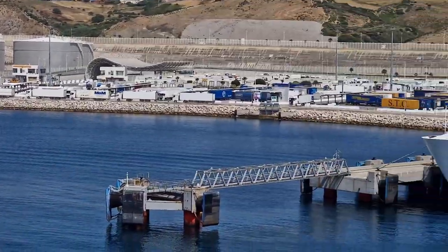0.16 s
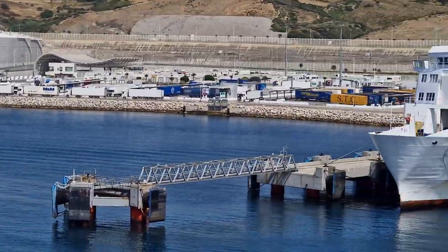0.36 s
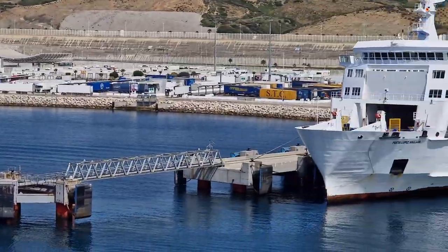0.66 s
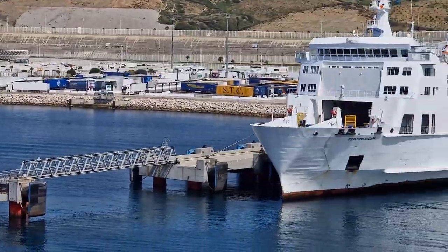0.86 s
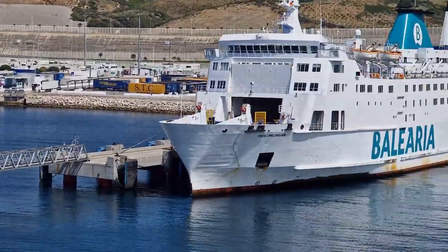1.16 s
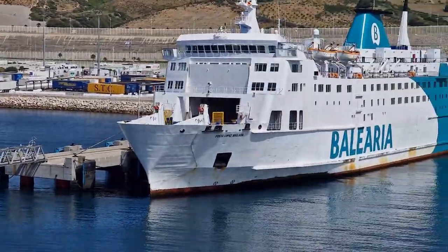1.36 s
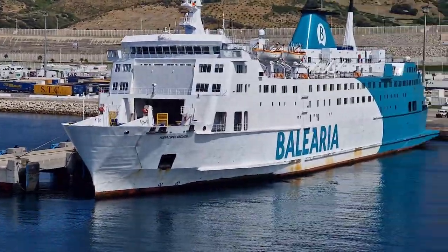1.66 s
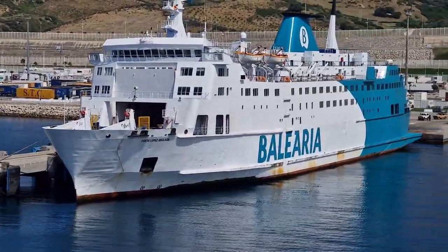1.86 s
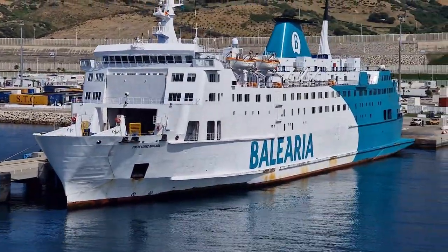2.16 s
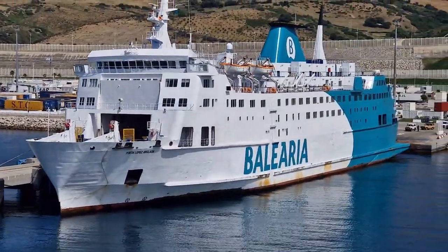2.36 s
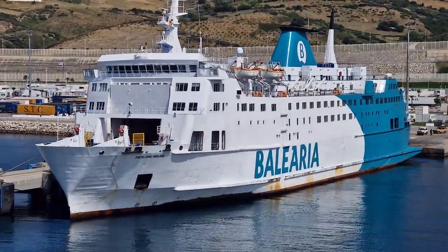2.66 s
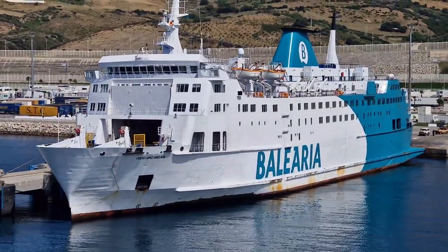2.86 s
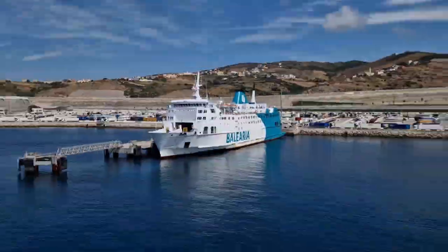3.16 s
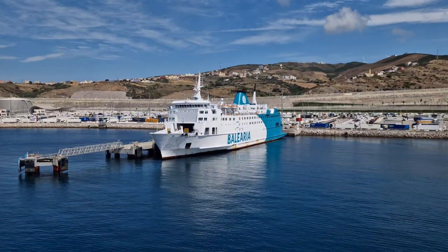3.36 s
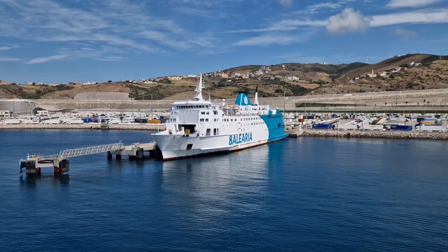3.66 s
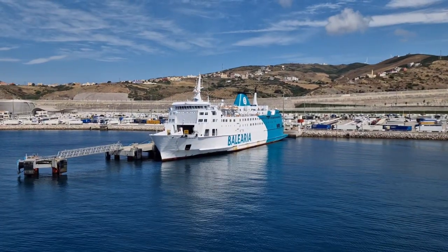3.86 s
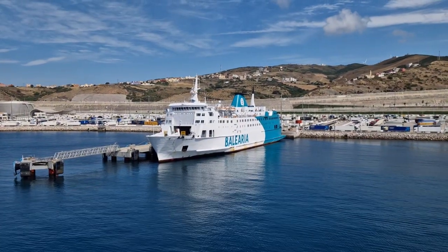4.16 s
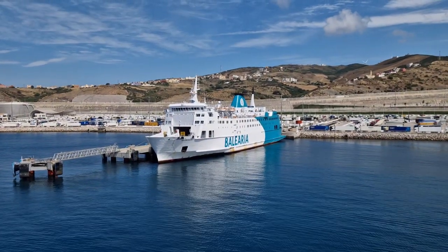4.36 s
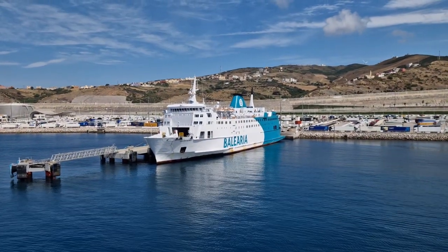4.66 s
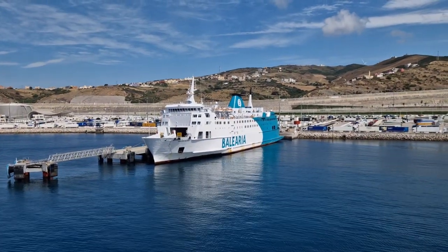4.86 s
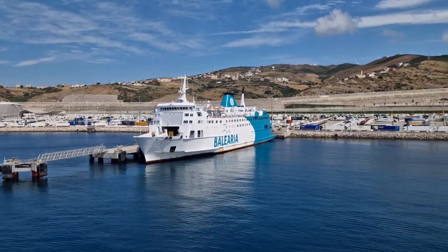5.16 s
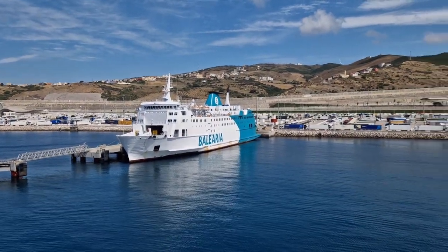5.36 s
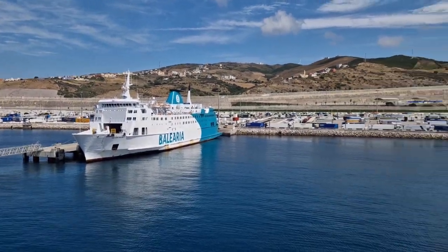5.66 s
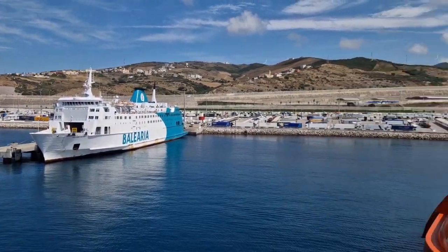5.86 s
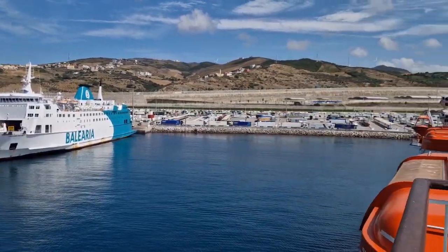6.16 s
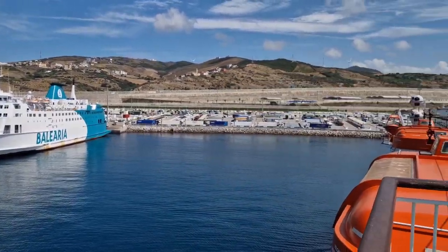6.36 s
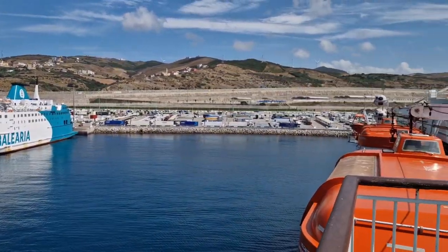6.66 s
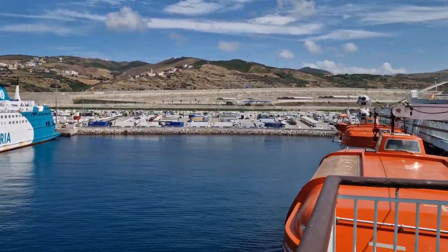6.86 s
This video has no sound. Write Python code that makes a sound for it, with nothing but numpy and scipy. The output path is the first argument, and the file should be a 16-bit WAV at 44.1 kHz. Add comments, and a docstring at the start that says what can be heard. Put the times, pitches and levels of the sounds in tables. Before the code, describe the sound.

On the open deck of a ferry in a harbour, wind buffets the microphone with a fluttering low rumble that mixes with the throb of two slow diesel engines. Behind them, deck ventilators roar and hiss with a faint, wavering whine. The rumble is strongest for the first three seconds, then eases a little, and the ventilator noise drifts toward the right as the microphone turns.

```python
"""The open deck of a ferry under way in a harbour. Two slow diesel engines run at nearly the same speed,
so their exhaust tones drift in and out of step and throb. Wind buffets the microphone with a fluttering
rumble. Behind them the deck ventilators roar, hiss and whine faintly as fans push air through ducts and
grilles; the roar and hiss slide between left and right as the microphone turns."""
import sys
import numpy as np
from scipy import signal
from scipy.fft import rfft, irfft
from scipy.io import wavfile
from scipy.ndimage import uniform_filter1d, minimum_filter1d

SR = 44100
rng = np.random.default_rng(int(sys.argv[2]) if len(sys.argv) > 2 else 0)


def log_audio(samples):
    """Write samples as a 16-bit WAV file to the path given in sys.argv[1]."""
    # one column per channel
    frames = np.atleast_2d(samples).T
    # limit to full scale, then quantise
    limited = np.clip(frames, -1, 1)
    pcm = np.round(limited * 32767).astype(np.int16)
    wavfile.write(sys.argv[1], SR, pcm)


N = 309305
TIME, SPECTRUM_HZ = np.arange(N) / SR, np.fft.rfftfreq(N, 1 / SR)
FRAME, HOP = 1024, 256  # air noise is built in short overlapping slices: length and step in samples
FRAME_S = (np.arange(N // HOP + 5) * HOP / SR)[:, None]
BIN_HZ = np.fft.rfftfreq(FRAME, 1 / SR)
MAIN_HZ, SECOND_HZ = 4.188, 4.24  # working cycles per second of each diesel

# Where the ventilators are as the microphone turns.
# Each row: time in seconds, lag in milliseconds (how much later the left side hears them).
LEFT_LAG = [(0, -0.14), (.9, -0.13), (1.3, -0.12), (1.6, 0.032), (3, -0.032), (4.75, 0.06), (5.25, 0.13),
            (5.75, .18), (6.25, 0.28), (7, 0.28)]
# The bass drops as the microphone leaves the strongest wind.
# Each row: time in seconds, bass level in dB, lift of the wind against the engines in dB.
BASS_LEVELS = [(0, -11, .5), (1.3, -9.5, -.5), (2, -10.5, 3.5), (2.5, -8.5, 1.5), (3.1, -11, -1),
               (3.25, -15, 2), (4.3, -14.5, 0.5), (5.75, -16.5, 0.8), (6.45, -15.5, 0.5), (7, -17.5, -1)]


def gain_of(db):
    """Turn decibels into a number to multiply by."""
    return 10 ** (np.asarray(db) / 20)


def normalised(x):
    """Scale a signal so that its average power is 1."""
    return x / np.sqrt(np.mean(x ** 2) + 1e-20)


def at_pitch(rows, hz):
    """Look up a table by frequency, sliding evenly in pitch from row to row."""
    row_hz, values = np.transpose(rows)
    return np.interp(np.log(hz + 1), np.log(row_hz + 1), values)


def at_time(rows, t):
    """Look up each column of a table at the times t, sliding from row to row."""
    seconds, *columns = np.transpose(rows)
    return [np.interp(t, seconds, column) for column in columns]


def coloured(x, rows):
    """Turn frequencies up or down. Each row: frequency in Hz, gain in dB."""
    return irfft(rfft(x) * gain_of(at_pitch(rows, SPECTRUM_HZ)), N)


def bump(centre, width, x):
    """A smooth rise to 1 at the centre and a fall after it."""
    return np.exp(-(2 * (x - centre) / width) ** 2)


def drift(rate_hz):
    """A random wobble, mostly slower than rate_hz."""
    return normalised(irfft(rfft(rng.standard_normal(N)) * np.exp(-(SPECTRUM_HZ / rate_hz) ** 2), N))


def tone(hz, db, waver_db, wander_radians, rate_hz):
    """One tone whose loudness and pitch waver in the moving air."""
    phase = 2 * np.pi * (hz * TIME + rng.random()) + wander_radians * drift(rate_hz)
    return gain_of(db) * normalised(gain_of(waver_db * drift(rate_hz)) * np.sin(phase))


def fan_whine():
    """Spinning fan blades make thin, wavering tones."""
    # Each row: frequency in Hz, level in dB.
    blade_tones = [(320, -40), (485, -47), (3272, -62.5), (3375, -66), (3682, -63.5), (3885, -67),
                   (4365, -66.5)]
    return sum(tone(hz, db, waver_db=3, wander_radians=1.15, rate_hz=5.8) for hz, db in blade_tones)


def air_noise(colour_db, patchy_db, flicker_db):
    """Ventilator noise, left and right: some arrives straight, the rest bounces off the ship."""
    # Each row: time in seconds, share that arrives straight (0 to 1) before scaling by pitch.
    direct_share = [(0, 0.57), (1, 0.61), (1.45, 0.05), (3, 0.19), (4.6, 0.03), (5.3, 0.47), (6, 0.61),
                    (7, 0.73)]
    # Each row: frequency in Hz, how alike the bounced sound is on both sides (-1 to 1).
    bounced_likeness = [(250, 0.98), (600, 0.68), (1000, 0.51), (1800, .52), (2400, -0.074),
                        (3100, -0.0023), (3900, -0.49), (4800, 0.37), (7500, 0.13), (11000, 0.025)]
    # The microphone's housing shades one side.
    # Each row: frequency in Hz, left minus right in dB per millisecond of lag.
    housing_shadow = [(300, 9.5), (900, 3), (1550, 21.5), (2200, 14.5), (3000, -1.5), (4800, -17.5),
                      (7500, -8), (12000, -4.5)]
    shape = (len(FRAME_S), len(BIN_HZ))
    straight, bounced, separate = rng.standard_normal((3, *shape)) + 1j * rng.standard_normal((3, *shape))
    patches = uniform_filter1d(rng.standard_normal(shape), size=24, axis=0)  # smooth over time
    patches = normalised(uniform_filter1d(patches, size=4, axis=1))  # and over frequency
    flicker = normalised(uniform_filter1d(rng.standard_normal(FRAME_S.shape), size=5, axis=0))
    # The highest pitches are scattered most.
    pitch_factor = at_pitch([(500, 0.89), (1600, 1.16), (4000, 0.87), (10000, .3)], BIN_HZ)
    share = np.clip(at_time(direct_share, FRAME_S)[0] * pitch_factor, 0, 1)
    lag_ms, = at_time(LEFT_LAG, FRAME_S)
    delay = np.exp(-2j * np.pi * BIN_HZ * lag_ms / 1000)
    alike = np.clip(at_pitch(bounced_likeness, BIN_HZ), -1, 1)
    bounced_right = alike * bounced + np.sqrt(1 - alike ** 2) * separate
    left = np.sqrt(share) * straight * delay + np.sqrt(1 - share) * bounced
    right = np.sqrt(share) * straight + np.sqrt(1 - share) * bounced_right
    shadow = gain_of(lag_ms * at_pitch(housing_shadow, BIN_HZ) / 2)
    slices = np.array([left * shadow, right / shadow])
    slices *= gain_of(colour_db + patchy_db * patches + flicker_db * flicker)
    return signal.istft(slices.transpose(0, 2, 1), nperseg=FRAME, noverlap=FRAME - HOP)[1][:, :N]


def level_swells(t):
    """The roar and hiss briefly grow louder or brighter: the changes in dB at the times t."""
    # Each row: middle and length in seconds, then roar, brightness, hiss and fizz changes in dB.
    swells = [(1.0, .27, -1, 3, 0, -1), (2.994, .34, 4, 1.5, 2.5, 2.8)]
    return sum(np.multiply.outer(lifts_db, bump(s, length, t)) for s, length, *lifts_db in swells)


def grille_hiss():
    """Air rushes through the grilles, with a high fizz that comes and goes."""
    # Each row: time in seconds, hiss level in dB, relative fizz in dB.
    levels = [(0, -39, -15.5), (0.75, -40, -19.5), (1.1, -38, -19.5), (1.6, -41, -18), (2.7, -41, -15.5),
              (3.2, -43, -10), (3.87, -42, -9.5), (4.07, -42, -13.5), (5.4, -43, -15), (5.8, -38.5, -20),
              (7, -40, -18)]
    # Each row: frequency in Hz, relative strength in dB.
    spectrum = [(1500, -14), (2600, 0), (3200, 1), (3900, -2.5), (4700, -2), (5600, -4), (6800, -12.5),
                (7500, -6.5), (8300, -16.5), (9200, -18.5), (10500, -25.5), (15500, -22)]
    # The hiss heard from the side. Each row: frequency in Hz, change in dB per millisecond of lag.
    side_colour = [(2500, -11.5), (3700, 1), (5200, -10), (7400, -16.5), (9000, 11), (12000, 0.5)]
    level_db = at_time(levels, TIME)[0] + level_swells(TIME)[2]
    fizz_db = at_time(levels, FRAME_S)[1] + level_swells(FRAME_S)[3]
    lag_ms, = at_time(LEFT_LAG, FRAME_S)
    treble_db = at_pitch([(5500, 0.19), (10000, 1)], BIN_HZ) * (fizz_db - fizz_db.mean())
    side_db = abs(lag_ms) * at_pitch(side_colour, BIN_HZ)
    # Side-on, the housing lifts one band of the hiss, which climbs as the microphone turns.
    band_hz = 1400 + 22500 * lag_ms
    band_db = 4.5 * np.maximum(lag_ms, 0) * bump(band_hz, width=1500, x=BIN_HZ)
    hiss = air_noise(treble_db + side_db + band_db, patchy_db=0.93, flicker_db=0.67)
    return gain_of(level_db + 0.1) * normalised(coloured(hiss, spectrum))


def ventilator_roar():
    """Fan noise booms through the ducts, which also ring at a few narrow pitches."""
    # The roar fades as the microphone turns away.
    # Each row: time in seconds, level in dB, relative brightness in dB.
    levels = [(0, -27.5, -5.5), (1, -27.5, -5.5), (1.6, -26.5, -8.5), (2.25, -28, -6.5), (3.9, -25.5, -7.5),
              (4.85, -28.5, -6), (5.3, -27, -7.5), (5.83, -33, -2), (6.5, -27.5, -7.5), (7, -33, -5.5)]
    # Each row: frequency in Hz, relative strength in dB.
    spectrum = [(130, -31), (215, -14.5), (245, 2.5), (290, -2), (322, 0), (400, -5.5), (600, -15.5),
                (800, -14.5), (950, -17.5), (1200, -16), (1500, -14), (2100, -19), (2600, -30),
                (4000, -62.5)]
    # Turning changes the tone. Each row: frequency in Hz, change in dB per millisecond of lag.
    turn_colour = [(260, -1.5), (330, -1.5), (430, 9), (600, -3.5), (900, 6.5), (1450, -1), (2300, 2.5)]
    # Each row: ringing frequency in Hz, width in Hz, lift in dB.
    duct_rings = [(850, 63, 3), (1122, 77, 3.5), (1428, 49, 3), (1577, 70, 2.5)]
    level_db = at_time(levels, TIME)[0] + level_swells(TIME)[0]
    bright_db = at_time(levels, FRAME_S)[1] + level_swells(FRAME_S)[1]
    lag_ms, = at_time(LEFT_LAG, FRAME_S)
    treble_db = at_pitch([(450, 0.024), (750, 0.75)], BIN_HZ) * (bright_db - bright_db.mean())
    turn_db = lag_ms * at_pitch(turn_colour, BIN_HZ)
    rings_db = sum(db / (1 + (2 * (BIN_HZ - hz) / width) ** 2) for hz, width, db in duct_rings)
    roar = air_noise(treble_db + turn_db + rings_db, patchy_db=1.2, flicker_db=0.33)
    return gain_of(level_db + 0.97) * normalised(coloured(roar, spectrum))


def wind_puffs():
    """Small swirls of air flap over the right side only, a little higher in pitch than the rumble."""
    # Each row: middle in seconds, length in seconds, level in dB.
    puffs = [(.25, .4, -33), (1.3, .3, -40), (1.85, 0.58, -24.5)]
    # Each row: frequency in Hz, relative strength in dB.
    spectrum = [(40, -30), (120, -4), (200, 0), (280, -18), (600, -56.5)]
    loudness = sum(gain_of(db) * bump(s, length, TIME) for s, length, db in puffs)
    right = loudness * normalised(coloured(rng.standard_normal(N), spectrum))
    return np.array([np.zeros(N), right])


def wind_rumble():
    """Swirling wind makes a lumpy low noise, mostly the same on both sides."""
    # Each row: frequency in Hz, relative strength in dB.
    spectrum = [(5, -55), (15, -26), (22, -6), (30, -3), (45, -1.5), (62, -2), (85, -2.5), (108, -11.5),
                (130, -11.5), (160, -17), (205, -23.5), (300, -47.5), (600, -83.5)]
    shared, left, right = (normalised(coloured(rng.standard_normal(N), spectrum)) for _ in range(3))
    _, wind_db = at_time(BASS_LEVELS, TIME)
    # Exhaust noise mingles with it and swells once per turn of the engine's shaft.
    pulse = 1 + 0.11 * np.sin(2 * np.pi * (2 * MAIN_HZ * TIME + rng.random()))
    return gain_of(wind_db - 19.5) * (pulse * shared + gain_of(-9.5) * np.array([left, right]))


def wind_gusts_db():
    """Strong gusts and lulls push the level up and down over a small random flutter."""
    # Each row: middle in seconds, length in seconds, change in dB (a lull is negative).
    gusts = [(0.027, 0.057, -6.5), (.11, .1, 4), (.7, 0.042, 3.5), (0.998, 0.048, -3.5),
             (1.21, 0.035, -3.5), (1.6, 0.076, -2.5), (1.888, 0.045, -3.5), (2.383, 0.056, 5),
             (3.253, 0.045, -5.5), (3.96, 0.033, -1), (4.32, .06, 3.5), (4.858, 0.038, -3.5),
             (5.34, 0.067, -2), (5.513, 0.12, 2), (5.83, 0.11, -7)]
    return sum(db * bump(s, length, TIME) for s, length, db in gusts) + 0.5 * drift(rate_hz=11)


def diesel_exhausts():
    """Each engine's exhaust hums at multiples of its working cycle, loudest at its firing rate."""
    # One table per engine. Each row: multiple of the working cycle, relative level in dB.
    main_tones = [(12, -18.5), (14, -36.5), (18, -34), (24, -30), (28, -28.5), (30, -31), (36, -40.5),
                  (42, -46), (44, -59)]
    second_tones = [(7, -43), (8, -37), (10, -22), (11, -32), (15, -36), (16, -38)]
    return sum(tone(cycle_hz * multiple, db, waver_db=2.0, wander_radians=0.12, rate_hz=0.89)
               for cycle_hz, tones in [(MAIN_HZ, main_tones), (SECOND_HZ, second_tones)]
               for multiple, db in tones)


def diesel_throb_db():
    """The main firing tone goes in and out of step with two tones of the second engine."""
    # Each row: throbs per second, time of a peak in seconds before any slip, depth in dB.
    beats = [(12 * MAIN_HZ - 11 * SECOND_HZ, 0.185, 1.6), (12 * MAIN_HZ - 10 * SECOND_HZ, 0.116, 1.5)]
    # The main engine's speed wanders a little. Each row: time in seconds, firings it has slipped behind.
    slip = [(0, 0.088), (2.2, 0.4), (3, 0.45), (4, 0.17), (5, 0.34), (7, 0.43)]
    behind, = at_time(slip, TIME)
    return sum(db * np.cos(2 * np.pi * (rate * (TIME - peak_s) - behind)) for rate, peak_s, db in beats)


def engines_and_wind():
    """Exhaust tones and wind rumble are evened out, then surge together with the throb and gusts."""
    bass = diesel_exhausts() + wind_rumble()
    window = signal.windows.hann(SR // 6)
    power = signal.fftconvolve(bass.mean(0) ** 2, window / window.sum(), "same")
    steady_bass = bass / np.sqrt(power + 1e-9)
    level_db, _ = at_time(BASS_LEVELS, TIME)
    return gain_of(level_db + diesel_throb_db() + wind_gusts_db() + 0.05) * steady_bass


def scene():
    """Everything heard on deck, left and right."""
    return engines_and_wind() + wind_puffs() + ventilator_roar() + grille_hiss() + fan_whine()


def bass_limiter(x):
    """Turn the bass down smoothly around peaks that would overload."""
    bass = coloured(x, [(170, -0.5), (260, -41.5)])
    overload = np.maximum(abs(bass).max(0) / .84, 1)
    safe_gain = minimum_filter1d(1 / overload, size=900)
    return x - bass + bass * uniform_filter1d(safe_gain, size=900)


def record(dry):
    """The microphone colours its two sides differently, tames bass peaks and cuts the highest treble."""
    # Each row: frequency in Hz, left minus right in dB.
    balance = [(60, 1.5), (150, 2.5), (380, 3), (750, 3.5), (1400, -1.3), (2600, 1.9), (4400, -0.3),
               (8000, -1.5), (14000, -0.2)]
    tilt_db = at_pitch(balance, SPECTRUM_HZ) / 2
    tilted = irfft(rfft(dry) * gain_of([tilt_db, -tilt_db]), N)
    treble_cut = signal.firwin(1023, cutoff=15750, window=("kaiser", 9), fs=SR)
    return signal.oaconvolve(bass_limiter(tilted), treble_cut[None], "same")


dry = scene()
out = record(dry)
log_audio(out)
```